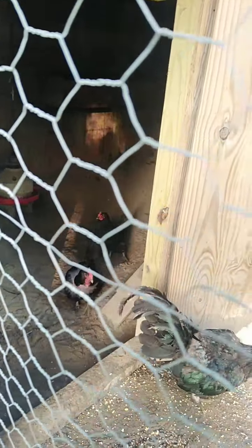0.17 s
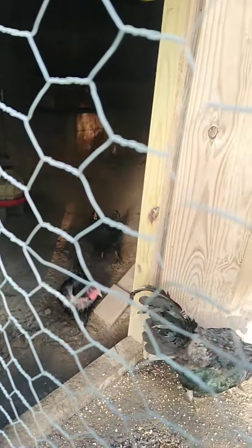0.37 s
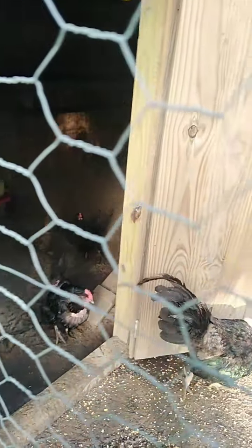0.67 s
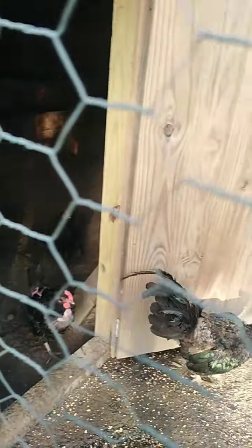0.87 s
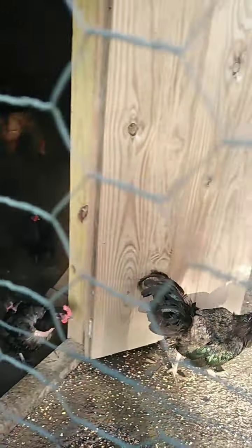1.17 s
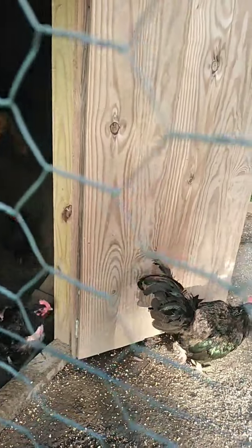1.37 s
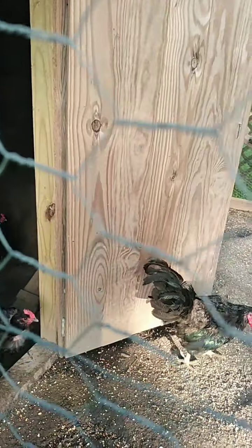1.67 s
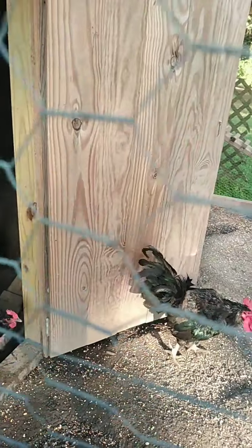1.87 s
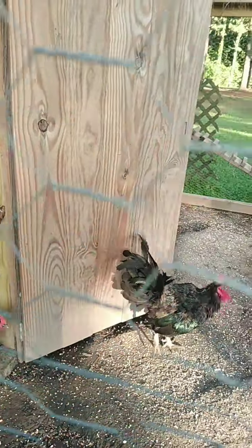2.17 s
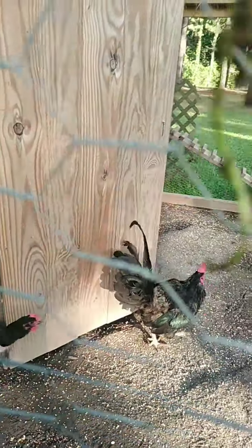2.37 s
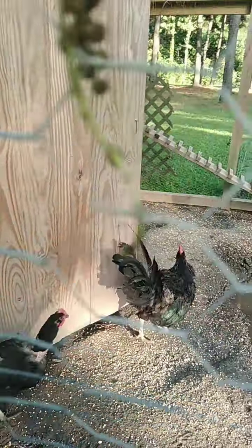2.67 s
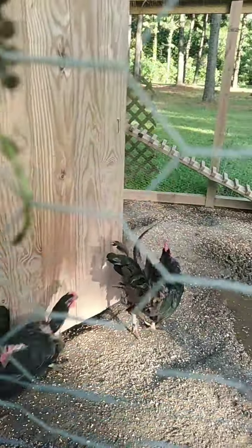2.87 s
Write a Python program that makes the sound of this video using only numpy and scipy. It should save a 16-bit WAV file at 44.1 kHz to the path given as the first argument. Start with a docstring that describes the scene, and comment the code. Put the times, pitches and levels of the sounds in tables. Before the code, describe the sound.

Chickens give short, slightly raspy clucks beside a wooden coop outdoors, with a dull brief echo. Dry rustling brushes close to the microphone, and wind thumps its right side late on, over a faint left-sided hiss.

```python
"""Chickens cluck in quick, short calls beside a wooden coop, outdoors. Each call is a sum of
overtones and rasping noise, shaped by a throat resonance; the coop adds a dull, short echo tail.
Gusts buffet the right microphone port: low noise with single thumps. A high hiss lies behind it,
almost all on the left. A dry rustle of grainy noise close to the microphone swells twice, with
lighter scuffs and a few small ticks, which are tiny bursts of noise."""
import sys
import numpy as np
from scipy import signal
from scipy.fft import rfft, irfft
from scipy.io import wavfile

SR = 44100
rng = np.random.default_rng(int(sys.argv[2]) if len(sys.argv) > 2 else 0)


def store_pcm(level_fs):
    """Save levels as 16-bit WAV."""
    pcm = np.round(np.clip(level_fs, -1, 1) * 32767).astype(np.int16)
    wavfile.write(sys.argv[1], SR, np.atleast_2d(pcm).T)


N = 132300
TIME = np.arange(N) / SR  # seconds


def from_db(db):
    """Turn decibels into a gain."""
    return 10 ** (np.asarray(db) / 20)


def rms_one(x):
    """Scale a sound to an rms (average strength) of 1."""
    return x / np.sqrt(np.mean(x ** 2) + 1e-20)


def in_time(rows):
    """Draw straight lines between (time, value) points, giving a value at every sample."""
    return np.interp(TIME, *np.transpose(rows))


def at_hz(points, hz):
    """Read the gain of a (frequency, dB) spectrum at the given frequencies."""
    f, db = np.transpose(points)
    return from_db(np.interp(np.log(hz + 1), np.log(f), db))


def panned(x, pan_db):
    """Place a sound in stereo; pan_db is how much louder the left is than the right."""
    return x * from_db([[pan_db / 2], [-pan_db / 2]])


def peak(f, hz, width_hz):
    """Gain of a steep resonance, 1 at its centre."""
    return 1 / (1 + (2 * (f - hz) / width_hz) ** 2) ** 2


def noise(gain_at):
    """Random noise coloured by a gain for each frequency, with an rms of 1."""
    spectrum = rfft(rng.standard_normal(N))
    return rms_one(irfft(spectrum * gain_at(np.fft.rfftfreq(N, 1 / SR)), N))


def soft_noise(cut_hz):
    """Noise that weakens steadily above cut_hz."""
    return noise(lambda f: 1 / (1 + (f / cut_hz) ** 2))


def drift(hz):
    """A random wavering with a spread of 1, mostly slower than hz."""
    return soft_noise(hz)


def wide_noise(spectrum):
    """Stereo noise, partly shared by both sides."""
    likeness = 0.24  # share of the power that is the same left and right
    shared, left, right = (noise(lambda f: at_hz(spectrum, f)) for _ in range(3))
    return np.sqrt(likeness) * shared + np.sqrt(1 - likeness) * np.array([left, right])


def hiss():
    """A nearly steady high noise, almost all on the left."""
    # colour of the hiss: f/Hz, relative level/dB
    hiss_spectrum = [(40, -31), (260, -8), (450, -27), (750, -16.5), (1000, -16), (1250, -8.5),
                     (1600, -6.5), (1900, -20), (2150, -7), (2400, -1.5), (2750, -5.5), (3400, -12),
                     (4400, -1), (5300, -5.5), (6400, 2), (7300, 1), (8800, -13.5), (12000, -18),
                     (14000, -43)]
    level_db, waver_db, right_db = -45, 0.65, -27.5
    gain = from_db(level_db + waver_db * drift(45))
    return gain * wide_noise(hiss_spectrum) * from_db([[0], [right_db]])


def buffet(start, db, hz):
    """One thump of wind: a low tone that swells quickly and dies away."""
    swell_cycles = 0.48  # cycles of the tone until it is strongest
    cycles = np.maximum(TIME - start, 0) * hz
    age = cycles / swell_cycles
    swell = age ** 2 * np.exp(2 * (1 - age))
    return from_db(db) * swell * np.sin(2 * np.pi * (cycles + rng.random()))


def wind():
    """Lumpy low noise with single buffets, almost all on the right port."""
    # rumble on the right port, before the lift below: t/s, level/dB
    right_level = [(0, -39.5), (.15, -42), (.26, -61.5), (.36, -59.5), (.41, -52), (.54, -39.5), (.59, -51),
                   (.65, -43), (.77, -44), (.88, -62.5), (.96, -46.5), (1.07, -41.5), (1.13, -54),
                   (1.28, -55.5), (1.35, -38), (1.5, -55), (1.6, -35.5), (1.69, -46), (1.87, -34.5),
                   (1.97, -44.5), (2.05, -44), (2.17, -36), (2.24, -29), (2.45, -37), (2.56, -34.5),
                   (2.7, -52), (2.79, -40), (2.88, -52), (3, -47.5)]
    # rumble on the sheltered left port: t/s, level/dB
    left_level = [(0, -90), (2.27, -75), (2.33, -45.5), (2.45, -61), (2.62, -59), (2.73, -70),
                  (2.85, -57.5), (3, -69)]
    # colour of the rumble: f/Hz, relative level/dB
    rumble_spectrum = [(25, -42), (40, -21), (58, 2), (90, 0), (130, -2), (200, -9), (300, -15), (450, -43),
                       (800, -50), (2000, -56.5)]
    # single thumps: t/s, level/dB, f/Hz
    buffets = [(0.505, -20.5, 137), (.635, -26.5, 127), (1.619, -15, 122), (1.72, -21, 203.7),
               (2.028, -15.5, 87), (2.069, -14, 182), (2.127, -17, 194), (2.203, -7, 148), (2.22, -13, 212),
               (2.277, -8.5, 162), (2.320, -14, 161), (2.391, -11.5, 140), (2.422, -17, 151),
               (2.498, -18, 129.4), (2.764, -16, 141)]
    right_lift_db, lumpy_db = 4.5, 3

    def rumble(db):
        lumpy_gain = from_db(db + lumpy_db * drift(26))
        return lumpy_gain * noise(lambda f: at_hz(rumble_spectrum, f))

    left = rumble(in_time(left_level))
    right = rumble(in_time(right_level) + right_lift_db)
    for row in buffets:
        right = right + buffet(*row)
    return np.array([left, right])


def rustle():
    """Grainy noise close to the microphone; each stroke swells, fades and has its own treble."""
    # strokes: t/s, level on the left/dB, rise/s, fall/s, treble relative to the rest/dB
    strokes = [(0, -35.5, 0.00093, 0.077, -9), (0.044, -34, 0.0057, 0.054, -11),
               (.425, -49, .018, 0.027, 9), (1.288, -41, 0.016, 0.016, -1), (1.408, -29.5, .07, 0.1, 5),
               (1.48, -23.5, 0.083, 0.037, 4), (1.534, -31.5, 0.024, 0.016, 12),
               (1.62, -39.5, .05, 0.16, -2), (1.825, -43, 0.014, 0.059, 10), (1.919, -26, 0.065, 0.077, 2),
               (2.039, -34, 0.011, 0.18, 4), (2.21, -38, 0.012, 0.12, 3.5),
               (2.483, -40.5, 0.032, 0.39, -3.5), (2.616, -48.5, .018, 0.029, 12.5),
               (2.81, -60, .012, 0.021, -3), (2.898, -53, .022, 0.023, 13)]
    # colour of the rustle: f/Hz, relative level/dB
    rustle_spectrum = [(200, -39), (500, -27), (1000, -18), (1400, -9.5), (1900, -10), (2350, -4),
                       (3300, -11.5), (4400, -2.5), (5300, -5), (7000, 5.5), (7800, -0.5), (9000, -8.5),
                       (11500, -14.5), (14500, -22)]
    treble_from_hz, right_db = 8440, -11.5
    grain_db, grain_hz = 1, 252

    body_power, treble_power = 0, 0
    for start, db, rise, fall, treble_db in strokes:
        swell = np.clip((TIME - start) / rise, 0, 1)
        fade = np.exp(-np.maximum(TIME - start - rise, 0) / fall)
        power = (from_db(db) * swell * fade) ** 2
        body_power = body_power + power
        treble_power = treble_power + power * from_db(treble_db) ** 2

    def band(kind):
        sos = signal.butter(6, treble_from_hz, kind, fs=SR, output="sos")
        return signal.sosfilt(sos, wide_noise(rustle_spectrum))

    strokes_sound = np.sqrt(body_power) * band("low") + np.sqrt(treble_power) * band("high")
    return strokes_sound * from_db(grain_db * drift(grain_hz)) * from_db([[0], [right_db]])


def ticks():
    """Tiny, bright snaps: noise around one frequency that starts at once and dies quickly."""
    # snaps: t/s, level before panning/dB, centre f/Hz
    snaps = [(.286, -34, 10000), (1.9695, -23, 6900), (1.991, -23, 7300)]
    fade_s, pan_db = .0012, 8
    half_width = .25  # half the width of the band, as a share of its centre frequency
    out = np.zeros(N)
    for start, db, hz in snaps:
        snap = noise(lambda f: 1 / (1 + ((f - hz) / (half_width * hz)) ** 4))
        fade = (TIME >= start) * np.exp(-abs(TIME - start) / fade_s)
        out = out + from_db(db) * fade * snap
    return panned(out, pan_db)


def cluck(start, length, attack, pitch_hz, fall, db, throat_hz, overtones_db, beak_db, rough, pan_db):
    """A short arched tone with jitter and pulsed rasp; the throat resonance drops as the beak closes."""
    # upper resonances of the throat: f/Hz, relative level/dB
    upper_resonances = [(300, -50), (900, -12.5), (1300, -34.5), (1600, -26), (1950, -20.5), (2300, -31.5),
                        (2850, -23), (3300, -34), (4500, -70)]
    throat_width_hz, beak_hz, beak_width_hz = 380, 1510, 550
    throat_start, throat_settle_s = 0.36, 0.0045  # starts higher by this share, then settles
    throat_close = 0.093  # share by which the resonance sinks as the beak closes
    pitch_arch, jitter, jitter_hz = .02, .07, 150  # arch and jitter are shares of the pitch
    fundamental_db, rasp = -6.5, .35
    shimmer_db, shimmer_hz = 4.5, 128  # unevenness of the level at full roughness
    release_s, swell_db = .012, 1  # the level grows by swell_db over the length of a call
    birds_db = -5

    def throat(f, centre_hz=throat_hz):
        main = peak(f, centre_hz, throat_width_hz)
        upper = from_db(overtones_db) * at_hz(upper_resonances, f)
        open_beak = from_db(beak_db) * peak(f, beak_hz, beak_width_hz)
        return main + upper + open_beak

    on = (TIME >= start) & (TIME < start + length + 10 * release_s)
    t = TIME[on] - start
    along = np.minimum(t / length, 1.2) - .5  # -0.5 at the start of the call, 0 in the middle

    arch = pitch_arch * ((2 * along) ** 2 - .15)
    hz = pitch_hz * (1 - arch - fall * along + jitter * rough * drift(jitter_hz)[on])
    settling = throat_start * np.exp(-t / throat_settle_s)
    closing = throat_close * np.maximum(2 * along, 0) ** 2
    centre_hz = throat_hz * (1 + settling - closing)

    phase = 2 * np.pi * np.cumsum(hz) / SR
    # the fundamental weakens when it lies far below the throat resonance
    tone = from_db(fundamental_db) * np.sin(phase) * np.minimum(2 * pitch_hz / throat_hz, 1) ** 3
    for k in np.arange(2, 14):
        # a resonance also shifts the phase of each overtone
        phase_lag = 2 * np.arctan(2 * (k * hz - centre_hz) / throat_width_hz)
        tone = tone + throat(k * hz, centre_hz) * np.sin(k * phase - phase_lag)

    pulsed_rasp = rasp * rough * (1 + np.cos(phase)) * noise(throat)[on]
    voice = rms_one(rms_one(tone) + pulsed_rasp)
    rise = 1 - np.exp(-t / attack)
    release = np.exp(-np.maximum(t - length + release_s, 0) / release_s)
    level = from_db(db + swell_db * along + shimmer_db * rough * drift(shimmer_hz)[on])
    out = np.zeros(N)
    out[on] = voice * rise * release * level
    return panned(out, pan_db) * from_db(birds_db)


def chickens():
    """All the calls, added together."""
    # calls: t/s, length/s, attack/s, pitch f/Hz, pitch fall/share, level before birds_db/dB,
    # settled throat resonance f/Hz, overtones/dB, open-beak resonance/dB, roughness/0-1,
    # left louder than right/dB
    calls = [(0.488, 0.037, 0.0037, 382, -0.11, -44, 730, -13, -36, 0.65, 2.5),
             (0.663, .030, 0.0037, 322.2, 0.016, -30, 730, -3.5, -41, 0.38, 8.5),
             (0.7778, 0.023, 0.00085, 326.3, -0.048, -22.5, 722, 3.5, -37, 0.38, 6),
             (0.829, 0.028, 0.0022, 304, 0.27, -33.5, 680, -9, -9, 0.54, 6.5),
             (0.903, 0.025, 0.0012, 290.3, 0.037, -32.5, 647, -11, -20, 0.42, 7),
             (1.0153, 0.037, 0.00089, 322.6, -0.018, -28.5, 690, -4.5, -27, 0.18, 9),
             (1.139, 0.017, 0.0019, 341.3, 0.072, -30, 753, -5, -13, 0.48, 7),
             (1.214, 0.044, .001, 303, 0.13, -42, 510, -12, -51, 0.3, 6),
             (1.298, 0.059, 0.013, 333.4, 0.083, -28.5, 676, -3.5, -32, 0.26, 8),
             (1.351, 0.045, 0.0017, 308.5, 0.1, -33.5, 660, -1.5, -24, 0.37, 11.5),
             (1.554, 0.047, 0.0043, 320.4, 0.095, -38, 645, -17, -34, 0.4, 11.5),
             (1.761, 0.038, 0.006, 348.6, 0.036, -22.5, 770, 0, -27, 0.15, 4.5),
             (1.905, 0.074, 0.01, 331, 0.001, -24.5, 721, -2.5, -37, 0.17, 2.5),
             (2.052, 0.041, 0.005, 311, 0.084, -32.5, 580, -7, -34, 0.2, 2.5),
             (2.219, 0.027, 0.0042, 441.5, 0.022, -27.5, 1220, 1.5, -1.5, 0.35, 10),
             (2.369, 0.034, 0.014, 352, -0.25, -33.5, 743, -2, -2, 0.71, 7.5),
             (2.938, 0.037, 0.024, 298.5, -0.218, -29.5, 513, -21, -1.5, 0.71, 8.5),
             (2.988, 0.02, 0.0012, 325, -0.034, -30.5, 640, 8, -23, 0.65, 7)]
    return sum(cluck(*row) for row in calls)


def ports(x):
    """An all-pass filter makes the right side lag in phase without changing its levels."""
    turn_hz, turn_width_hz = 1520, 500  # around here the two ports hear the birds out of phase
    r = np.exp(-np.pi * turn_width_hz / SR)
    a = np.array([1, -2 * r * np.cos(2 * np.pi * turn_hz / SR), r * r])
    return np.array([x[0], signal.lfilter(a[::-1], a, x[1])])


def coop(x):
    """Dull, short reverberation from the boards: each side is smeared by fading, softened noise."""
    t60_s, cut_hz, level_db = 0.58, 2400, -11.5  # t60_s: time to fade by 60 dB

    def one_side():
        fade = from_db(-60 * TIME / t60_s) * (TIME > .006)  # echoes start after 6 ms
        tail = soft_noise(cut_hz) * fade
        tail = tail / np.sqrt(np.sum(tail ** 2) * SR / 2 / cut_hz)
        return signal.fftconvolve(x, tail)[:N]

    return from_db(level_db) * np.array([one_side(), one_side()])


def scene():
    """Chickens and their coop, with wind, hiss, rustle and ticks."""
    birds = chickens()
    birds_and_coop = ports(birds) + coop(birds.mean(axis=0))
    return birds_and_coop + wind() + hiss() + rustle() + ticks()


def record(dry):
    """Filters thin the deep bass and cut the top steeply."""
    low_cut_hz, high_cut_hz = 59, 14400
    bass_cut = signal.butter(4, low_cut_hz, "high", fs=SR, output="sos")
    top_cut = signal.ellip(12, .1, 80, high_cut_hz, fs=SR, output="sos")
    return signal.sosfilt(top_cut, signal.sosfilt(bass_cut, dry))


dry = scene()
out = record(dry)
store_pcm(out)
```